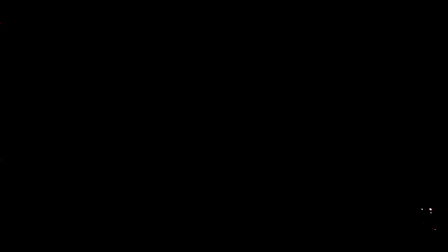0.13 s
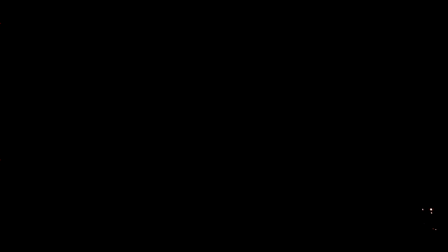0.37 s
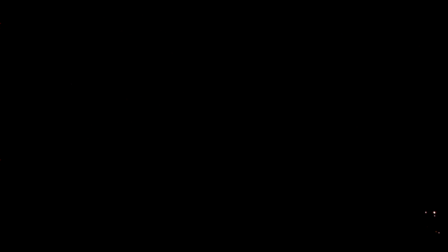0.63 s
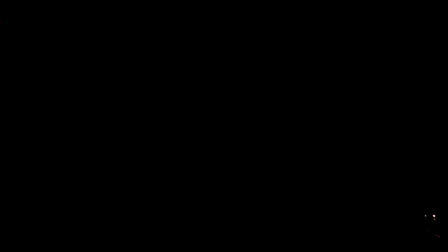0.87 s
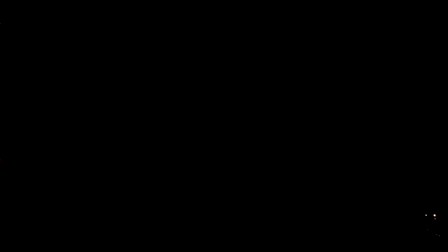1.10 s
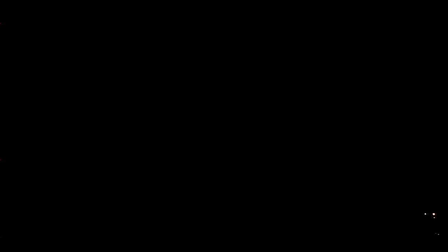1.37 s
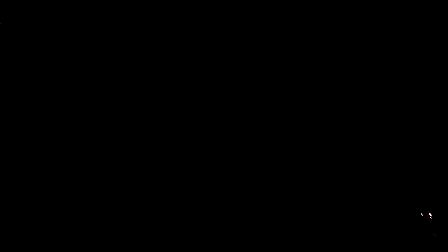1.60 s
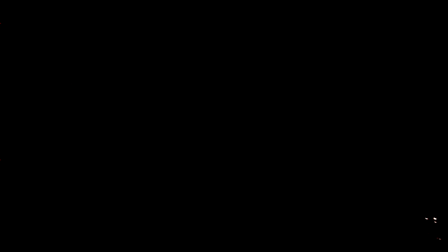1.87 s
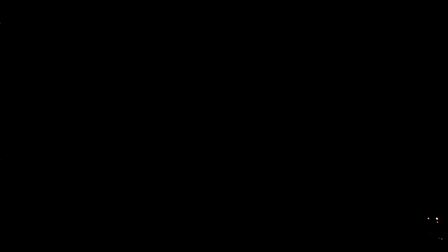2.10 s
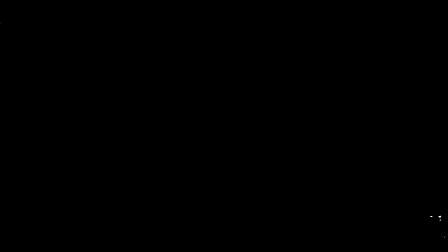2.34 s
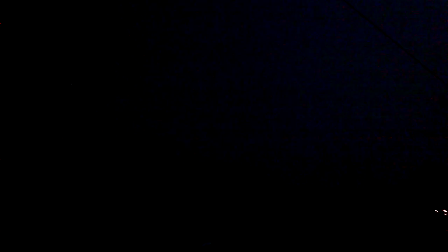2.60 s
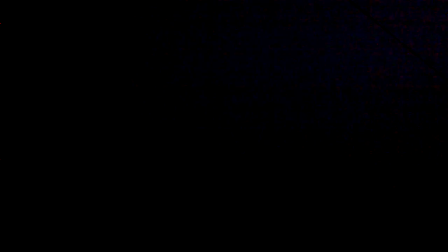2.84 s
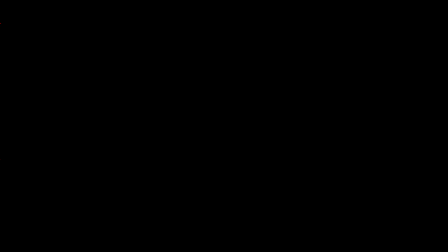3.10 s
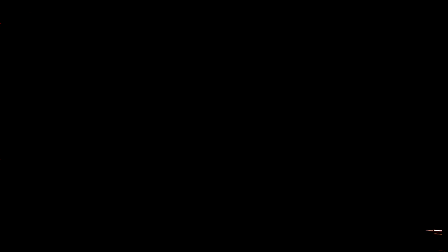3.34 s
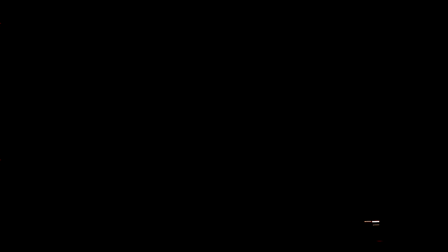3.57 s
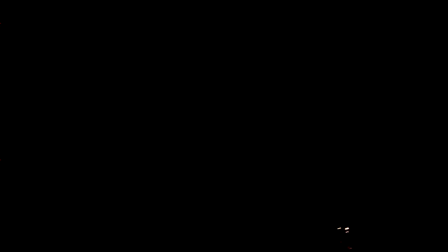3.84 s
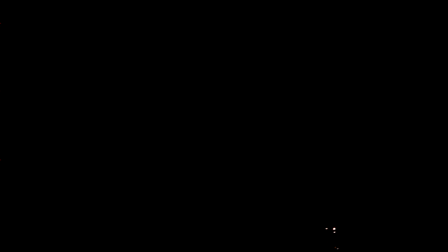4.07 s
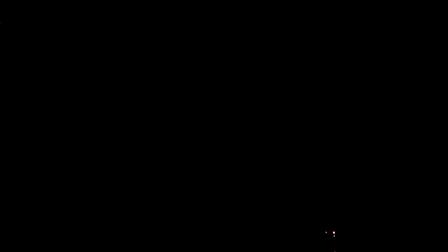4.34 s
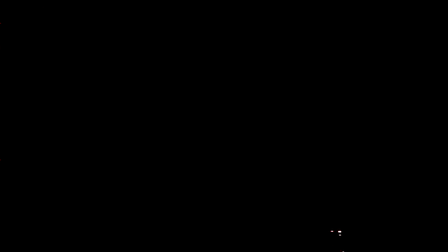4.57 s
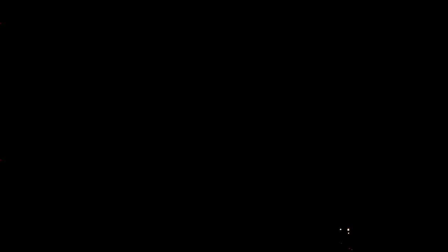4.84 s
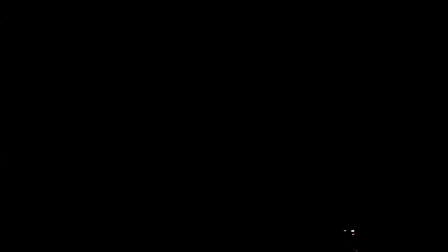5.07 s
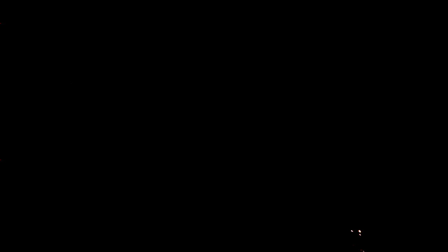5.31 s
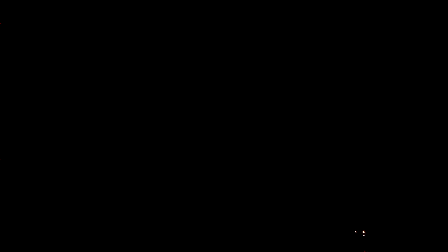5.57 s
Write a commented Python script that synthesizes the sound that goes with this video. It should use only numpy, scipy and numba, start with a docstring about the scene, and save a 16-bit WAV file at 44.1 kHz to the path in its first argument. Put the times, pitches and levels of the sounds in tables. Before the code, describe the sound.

Outdoors at night, heard from a sheltered doorway. Far thunder rolls over hissing, pattering rain, with run-off splashes, sharp drop slaps and small drips. A near peal then cracks in rapid bursts, mostly from the left, covering the rain. After a short lull the thunder swells again, lower and rounder, as rain slowly returns. Small camera stereo, thin in the deep bass.

```python
"""Night storm heard from a sheltered doorway by a small camera with two close microphone ports.
From the start, far thunder rolls as scattered noise fronts; rain hisses and patters as grainy noise,
run-off splashes in short bursts, drops slap as single clicks and drips plink as wavering tones.
After 2.3 s a near peal cracks in bursts, mostly from the left, and the rain sinks beneath it.
A lull follows; from about 3.6 s the thunder swells again, and the rain creeps back towards the end."""
import sys
import numpy as np
from scipy import signal
from scipy.fft import rfft, irfft
from scipy.io import wavfile
from scipy.ndimage import uniform_filter1d
from numba import njit

SR = 44100
rng = np.random.default_rng(int(sys.argv[2]) if len(sys.argv) > 2 else 0)


def int16_out(signal):
    """Quantize to a 16-bit WAV file."""
    q = np.round(np.clip(np.atleast_2d(signal).T, -1, 1) * 32767)
    wavfile.write(sys.argv[1], SR, q.astype(np.int16))


def volts_from_db(level):
    """Convert decibel levels to linear amplitude ratios."""
    exponent = np.asarray(level, float) / 20
    return 10 ** exponent


N = 250929
TIME = np.arange(N) / SR
CROSS_LAG = 17  # samples by which each port's copy is late in the other


def curves(table):
    """Join the rows of a table over time, one curve for each column after start_s."""
    start_s, *columns = np.transpose(table)
    return [np.interp(TIME, start_s, column) for column in columns]


def colour(x, points):
    """Shape a spectrum by (Hz, dB) points, joined along log frequency."""
    hz, db = np.transpose(points)
    log_hz = np.log(np.arange(1, N // 2 + 2) * SR / N)
    gain_db = np.interp(log_hz, np.log(hz), db)
    return irfft(rfft(x) * volts_from_db(gain_db), N)


@njit
def svf(x, hz, width):
    """State-variable band-pass whose centre and width may move, gain 1 at the centre."""
    y = np.empty(len(x))
    band_state, low_state = 0., 0.
    for i in range(len(x)):
        g = np.tan(np.pi * hz[i] / SR)
        damping = width[i] / hz[i]
        v = (band_state + g * (x[i] - low_state)) / (1 + g * (g + damping))
        band_state = 2 * v - band_state
        low_state += 2 * g * v
        y[i] = damping * v
    return y


def band(x, hz, width):
    """Band-pass every channel; centre and width in Hz, fixed or moving."""
    ones = np.ones(x.shape[-1])
    return np.array([svf(row, hz * ones, width * ones) for row in x])


def unit(x):
    """Scale so that the common part has rms 1 once its late copy is taken away."""
    return x / np.std(x[0, CROSS_LAG:] - x[0, :-CROSS_LAG])


def walk(rate):
    """Random levels, a new one every 1 / rate s, slewed twice; rms near 0.7."""
    hold = int(SR / rate)
    steps = np.repeat(rng.standard_normal(N // hold + 1), hold)
    slewed = uniform_filter1d(uniform_filter1d(steps, hold), hold)
    return 0.98 * slewed[:N]


def grainy(length, per_s, spread_db, haze):
    """Two unrelated noises gated by the same clicks of scattered size, over a steady noise haze."""
    size_db = spread_db * np.minimum(rng.exponential(size=length), 5.0)
    clicks = (rng.random(length) < per_s / SR) * volts_from_db(size_db)
    grain_noise, haze_noise = rng.standard_normal((2, 2, length))
    return clicks * grain_noise * np.sqrt(SR / per_s) + haze * haze_noise


def bursts(rows, rise_s, per_s, spread_db, haze, spray_db, impact):
    """Impacts (s, dB, Hz, octaves, t60 s): quick rise, one band plus broad spray, decay cut at 0.2 s."""
    out = np.zeros((2, N + SR))
    t = TIME[:SR // 5]
    for start_s, level_db, hz, octaves, t60 in rows:
        width = hz * (2 ** (octaves / 2) - 2 ** (-octaves / 2))
        grains = grainy(len(t), per_s, spread_db, haze)
        # the first contact is one sharp tick
        grains[:, int(rise_s * SR)] += impact * np.array([1, rng.uniform(-1.3, 1)])
        core = band(band(grains, hz, width), hz, 0.35 * width)
        spray = band(grains, 7200.0, 7600.0)
        shape = (1 - np.exp(-t / rise_s)) * volts_from_db(-60 * t / t60)
        burst = shape * (core + volts_from_db(spray_db) * spray)
        level = volts_from_db(level_db) * np.std(shape) / burst.std(axis=1, keepdims=True)
        first = int(start_s * SR)
        out[:, first:first + len(t)] += level * burst
    return out[:, :N]


# far roll, near peal, lull and second swell; the body is set ahead of FAR_AIR:
# start_s [s], body_db [dB], deep_db [dB over body_db], rattle_db [dB over body_db], body_hz [Hz]
THUNDER = [(0.0, -25.5, -11, 0.5, 300), (0.14, -34, -4, -23, 297), (0.75, -28.5, -9, -15, 283),
           (1.25, -45.5, 6.5, 6, 291), (1.38, -29, -10.5, -1, 352), (1.65, -29.5, -8.5, -2, 324),
           (2.02, -34, -9, 5.5, 337), (2.28, -32.5, -9, 0.5, 317), (2.41, -20.5, -9.5, 0, 362),
           (2.55, -24.5, -11, -4.5, 380), (2.77, -23.5, -14, -14, 360), (2.93, -27, -8, -2, 364),
           (3.0, -18.5, -14.5, -13, 342), (3.08, -30, -9, -16, 366), (3.15, -34, -10, 0.5, 350),
           (3.53, -34, -13.5, -4.5, 326), (3.76, -21.5, -14.5, -35, 258), (4.1, -20.5, -15.5, -55, 272),
           (4.45, -28, -10.5, -4, 334), (4.58, -23, -13.5, -41, 300), (5.0, -26, -12.5, -18, 305),
           (5.69, -25.5, -9, -30, 298)]
# doorway hollows that thunder rings: centre_hz [Hz], width_hz [Hz], level_db [dB]
HOLLOWS = [(244.2, 16.6, 0), (300, 10, -12), (432, 23, -8), (509.5, 9.1, -3.5)]
# what ground and distance leave of the thunder's tone: pitch_hz [Hz], gain_db [dB]
FAR_AIR = [(60, -16), (120, -12), (190, -4.5), (225, 2), (900, -7.5), (1400, -11), (2500, -18),
           (16000, -48)]


def thunder():
    """Shock fronts along the bolt arrive scattered; distance leaves a deep end, a body and a rattle."""
    body_db, deep_db, rattle_db, body_hz = curves(THUNDER)
    fronts = grainy(N, per_s=300, spread_db=1.5, haze=2.52) * volts_from_db(0.49 * walk(25.3))
    body = band(band(fronts, body_hz, 1.05 * body_hz), body_hz, 1.05 * body_hz)
    for centre_hz, width_hz, level_db in HOLLOWS:
        body = body + volts_from_db(level_db) * band(fronts, centre_hz, width_hz)
    rattle = band(band(fronts, 600.0, 630.0), 626.0, 900.0)
    roll = unit(body) + volts_from_db(rattle_db) * unit(rattle)
    deep = band(band(rng.standard_normal((2, N)), 121.5, 48.6), 164.0, 190.0)
    return colour(volts_from_db(body_db) * roll + claps(), FAR_AIR) + volts_from_db(body_db + deep_db) * unit(deep)


# separate claps in the peals, set ahead of FAR_AIR: start_s [s], level_db [dB], centre_hz [Hz]
CLAPS = [(2.312, -7.5, 366), (2.397, -9, 214), (2.419, -13, 428), (2.443, -5.5, 424), (2.479, -4, 402),
         (2.499, -8.5, 295), (2.61, -7, 363), (2.647, -1, 350), (2.68, -7, 370), (2.715, -10.5, 280),
         (2.776, -8, 295), (2.864, -6.5, 336), (2.965, -9, 485), (2.987, -5.5, 370), (3.206, -4.5, 153),
         (3.664, -13.5, 231), (3.729, -9, 234), (3.785, -11, 253), (3.85, -10, 246), (3.926, -3, 237),
         (4.145, -4, 246), (4.245, -13, 236), (4.389, -11, 272), (4.537, -13, 238), (4.694, -17, 256)]


def claps():
    """Each clap is a dense bunch of shock fronts led by a sharp crack, quickly dying away."""
    octaves, t60_s = 1.3, 0.086
    rows = [(start_s, level_db, hz, octaves, t60_s) for start_s, level_db, hz in CLAPS]
    return bursts(rows, rise_s=0.01004, per_s=360, spread_db=4.0, haze=2.9, spray_db=-60, impact=23.0)


# run-off hitting wet ground: start_s [s], level_db [dB], centre_hz [Hz], t60_s [s]
SPLASHES = [(0.089, -26, 2730, 0.11), (0.227, -26.5, 6650, 0.073), (0.284, -24, 4070, 0.18),
            (0.398, -26, 2730, 0.25), (0.459, -29, 7400, 0.097), (0.572, -25.5, 4930, 0.27),
            (0.687, -21.5, 7400, 0.14), (0.715, -20.5, 2410, 0.084), (0.842, -22, 6400, 0.046),
            (0.922, -28, 2360, 0.22), (1.032, -22.5, 4740, 0.33), (1.154, -27, 2170, 0.071),
            (1.265, -22, 6340, 0.12), (1.315, -24.5, 6100, 0.11), (1.423, -28, 3600, 0.16),
            (1.508, -27.5, 2430, 0.17), (1.687, -21.5, 4530, 0.42), (1.7462, -21, 6000, 0.13),
            (1.849, -27.5, 7600, 0.29), (1.946, -29, 9250, 0.11), (1.984, -28.5, 5350, 0.25),
            (2.052, -28.5, 3300, 0.088), (2.248, -28.5, 4000, 0.35), (2.335, -27.5, 7160, 0.15),
            (2.361, -28.5, 6810, 0.47), (2.615, -32, 3000, 0.055), (3.132, -33.5, 2970, 0.083),
            (3.394, -36, 2900, 0.06), (4.007, -32, 3060, 0.08), (4.192, -31.5, 7560, 0.058),
            (4.356, -28.5, 3520, 0.21), (4.475, -34.5, 3340, 0.24), (4.579, -35.5, 3450, 0.31),
            (4.762, -31.5, 6840, 0.074), (4.892, -31.5, 2460, 0.13), (5.04, -29, 7200, 0.086),
            (5.125, -32, 3320, 0.06), (5.148, -29, 6560, 0.12), (5.203, -29, 5840, 0.044),
            (5.387, -31.5, 3980, 0.39), (5.439, -37, 3600, 0.071), (5.521, -27.5, 2420, 0.16),
            (5.673, -27, 7500, 0.063)]


def splashes():
    """Run-off breaks up on wet ground: a tick and a spray of grains, wider in pitch the longer it lasts."""
    octaves_per_s = 11.8  # bandwidth in octaves per second of t60
    rows = [(start_s, level_db, hz, octaves_per_s * t60, t60) for start_s, level_db, hz, t60 in SPLASHES]
    return bursts(rows, rise_s=0.001244, per_s=1800, spread_db=-1.5, haze=1.0, spray_db=-9, impact=10)


# big drops slapping something hard close by: start_s [s], peak_db [dB in the common part], centre_hz [Hz]
TICKS = [(0.471, -14, 6780), (0.495, -12, 6900), (0.691, -14, 6800), (0.843, -27, 6470), (1.033, -15, 6660),
         (1.7443, -4, 4300), (1.7514, -14, 6530), (1.8868, -12, 5960), (4.355, -17, 3490),
         (4.578, -16, 6650), (5.0389, -17, 6720), (5.1482, -21, 6260)]


def ticks():
    """A slap is a single click, over in a cycle or two, a little nearer the left port."""
    out = np.zeros((2, N))
    impulse = (np.arange(200) == 0) * np.array([[1.], [.6]])  # common and differing parts
    for start_s, peak_db, hz in TICKS:
        click = band(impulse, hz, 1.1 * hz)
        first = int(start_s * SR)
        out[:, first:first + 200] += volts_from_db(peak_db) * click / click.max()
    return out


# drips into standing water: start_s [s], level_db [dB before the rise], pitch_hz [Hz], t60_s [s]
PLINKS = [(0.106, -29.5, 1915, 0.16), (0.413, -27, 1890, 0.076), (.485, -28, 1300, 0.069),
          (.49, -23, 774, 0.069), (.716, -23, 2220, 0.082), (0.72, -26, 1004, 0.08),
          (0.741, -26.5, 1006, 0.08), (0.761, -26, 1004, 0.09), (1.291, -30, 1705, 0.077),
          (3.22, -30.5, 760, 0.28), (3.784, -37, 1830, .05)]


def plinks():
    """Each drip rings a pocket of water for a moment: a wavering note that barely rises."""
    out = np.zeros((2, N))
    for start_s, level_db, hz, t60 in PLINKS:
        t = np.maximum(TIME - start_s, 0)
        waver = np.cumsum(.012 * walk(90)) / SR
        turns = hz * (t + .12 * t ** 2 + waver) + rng.random((2, 1))
        rise = 1 - np.exp(-t / 0.0046)
        out += rise * volts_from_db(level_db - 60 * t / t60) * np.sin(2 * np.pi * turns)
    return out


# rain, sinking under the near peal and creeping back: start_s [s], level_db [dB]
RAIN = [(0.0, -27), (0.33, -30.5), (0.58, -27), (1.7, -27.5), (2.06, -32), (2.25, -30.5), (2.63, -40),
        (2.93, -40), (3.38, -37.5), (4.28, -38.5), (5.69, -33.5)]
# tone of the hiss: pitch_hz [Hz], gain_db [dB]
RAIN_COLOUR = [(200, 18.5), (400, 7), (700, 1.5), (1100, -2.5), (1650, -5), (2200, -1.5), (4500, -4),
               (7100, 0.5), (9700, -2.5), (12500, -3), (16000, -4.5)]


def rain():
    """Countless far drops blur to a hiss that flickers band by band; nearer ones patter on top."""
    drops = grainy(N, per_s=2500, spread_db=3.0, haze=2.9)
    gust_db = .7 * walk(5.49)  # shared by all bands
    hiss = np.zeros((2, N))
    for hz in 200 * 2 ** np.arange(0, 6.6, .5):
        flicker_db = 4.1 * walk(19)
        hiss += volts_from_db(gust_db + flicker_db) * band(drops, hz, hz / 2.0)
    chance = rng.random((4, 170))  # 170 nearer drops
    start_s = N / SR * chance[0]
    over_hiss_db = -9 + 7 * chance[1]
    centre_hz = 1800 * 5 ** chance[2]
    octaves = np.full(170, 2.7)
    t60_s = 0.043 + 0.26 * chance[3]
    rows = zip(start_s, over_hiss_db, centre_hz, octaves, t60_s)
    patter = bursts(rows, rise_s=0.00073, per_s=1500, spread_db=1, haze=1.0, spray_db=-6.5, impact=9.5)
    level_db, = curves(RAIN)
    return volts_from_db(level_db) * (unit(colour(hiss, RAIN_COLOUR)) + patter)


# gain of the differing part; sound from all around differs more with pitch up to the low treble:
# pitch_hz [Hz], gain_db [dB]
SCATTER = [(60, -22), (120, -20.5), (240, -17.5), (480, -8), (870, -4), (1100, 1), (1600, 5), (2200, -0.5),
           (3300, 0), (16000, 0)]
# side the thunder comes from, the near peal mostly left:
# start_s [s], lead_samples [samples, left early and right late by about this much]
LEAN = [(0.0, 0.5), (1.45, 2.5), (2.16, 4.5), (2.33, 5), (2.98, 6), (3.04, -1.5), (3.2, 3), (3.93, 0.6),
        (5.69, 1.0)]


def scene():
    """Every source gives a part common to both ports and a part that differs between them."""
    sky = thunder()
    common, differ = sky + splashes() + ticks() + plinks() + rain()
    port_mismatch = -0.12  # the left port is a little weaker
    differ = colour(differ, SCATTER) + port_mismatch * common
    # thunder from one side reaches that port first, clearest in its body; its slope shifts it in time
    lead_samples, = curves(LEAN)
    differ = differ + lead_samples * np.gradient(band(sky, 270.0, 500.0)[0])
    return np.array([common + differ, common - differ])


def band_limit(x):
    """A steep low-pass at the top of the band."""
    return signal.sosfilt(signal.butter(12, 16200, fs=SR, output="sos"), x)


def record(dry):
    """The camera cuts bass, takes a late copy of each port from the other, adds flutter, cuts the top."""
    bass_cut = signal.butter(8, 76, "high", fs=SR, output="sos")
    ports = signal.sosfilt(bass_cut, dry)
    late = np.pad(ports[::-1], ((0, 0), (CROSS_LAG, 0)))[:, :N]
    flutter = volts_from_db(-46) * band(rng.standard_normal((2, N)), 35., 60.)
    top_cut = signal.ellip(8, .2, 60, 15600, fs=SR, output="sos")
    wide = signal.sosfilt(top_cut, ports - late + flutter)
    return band_limit(wide)


dry = scene()
out = record(dry)
int16_out(out)
```